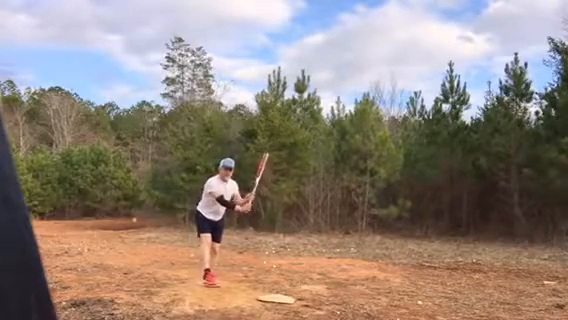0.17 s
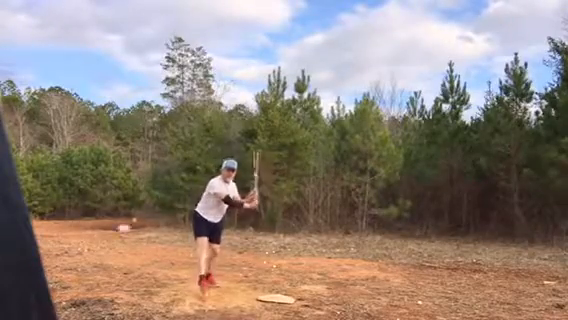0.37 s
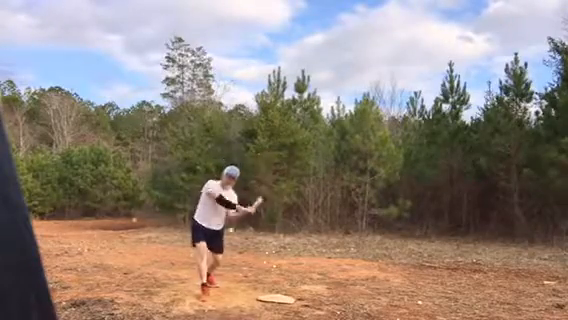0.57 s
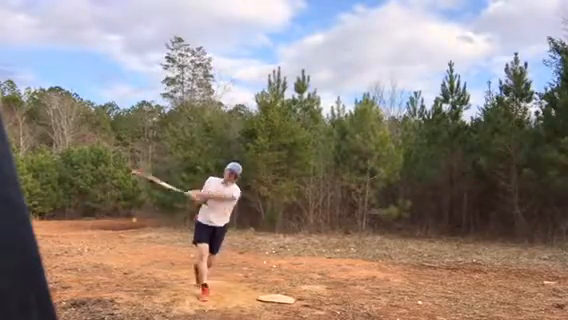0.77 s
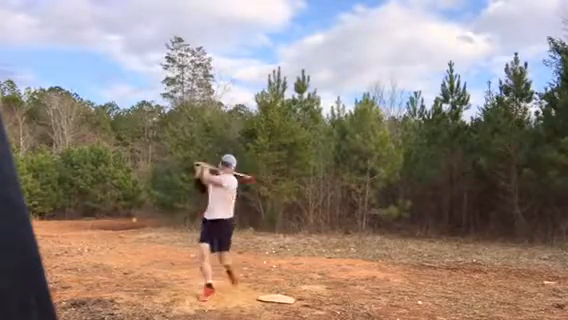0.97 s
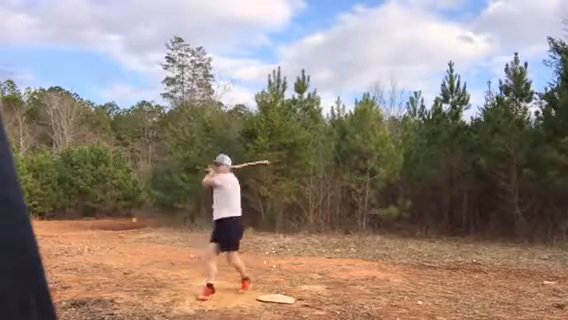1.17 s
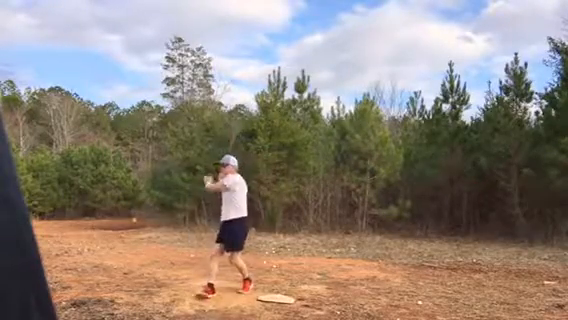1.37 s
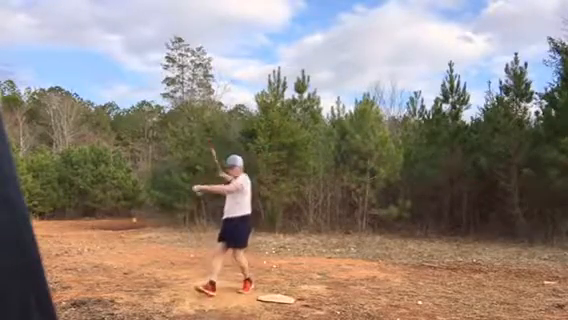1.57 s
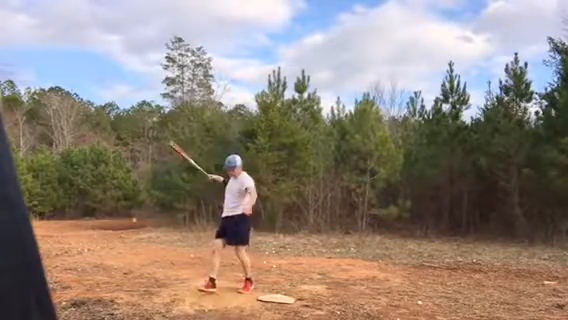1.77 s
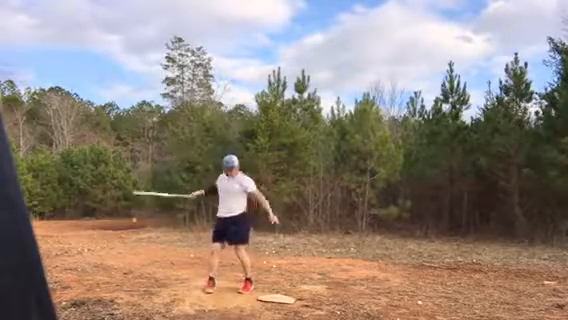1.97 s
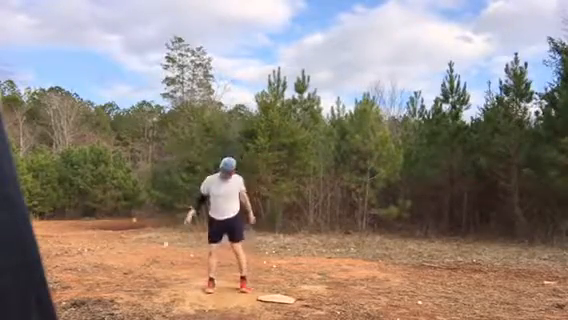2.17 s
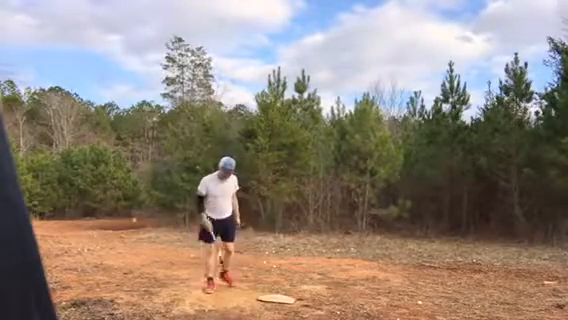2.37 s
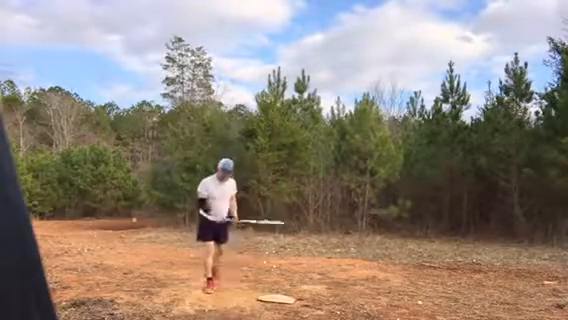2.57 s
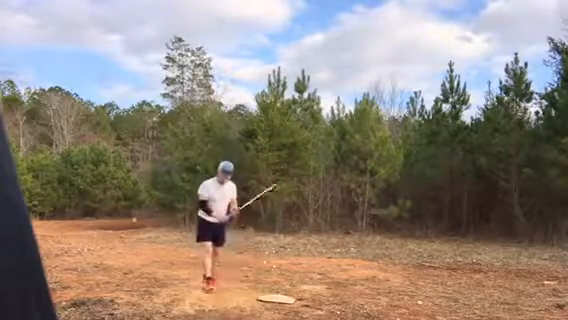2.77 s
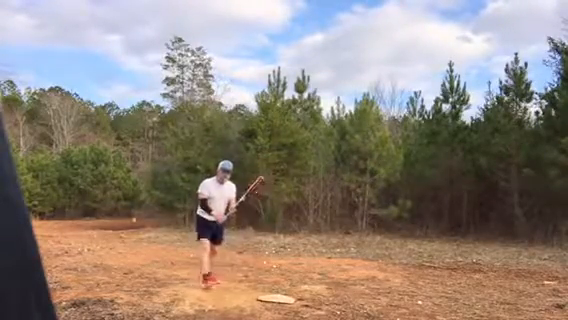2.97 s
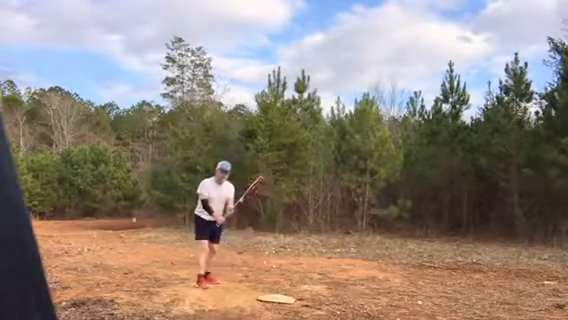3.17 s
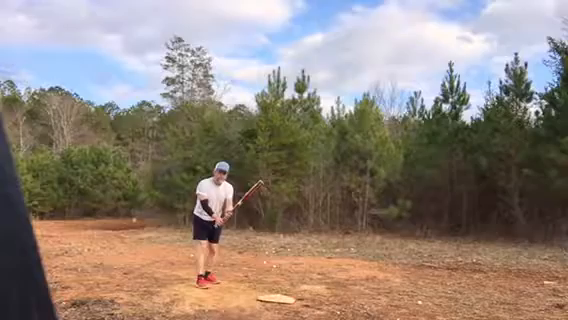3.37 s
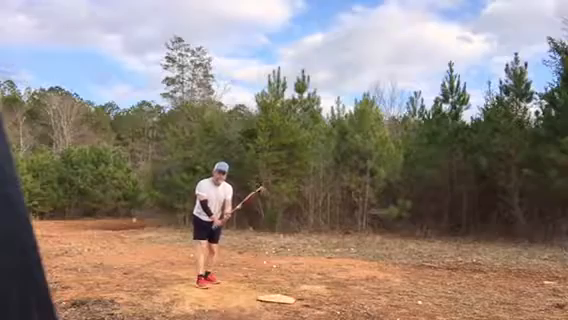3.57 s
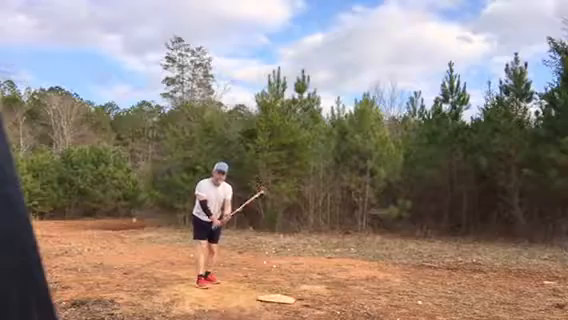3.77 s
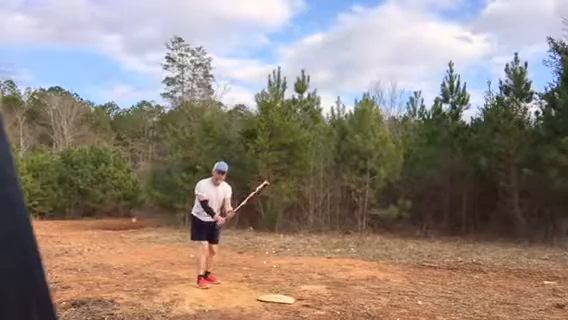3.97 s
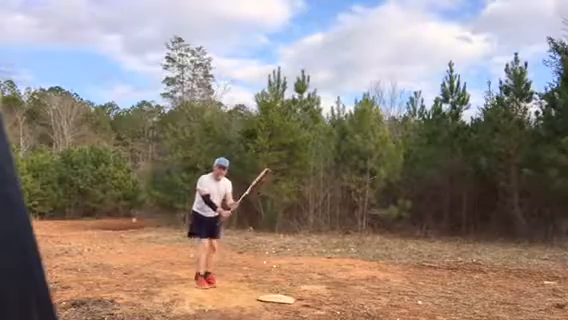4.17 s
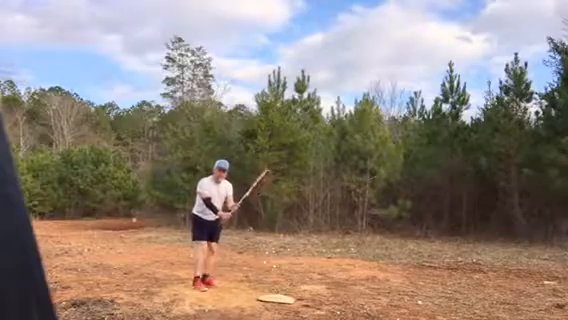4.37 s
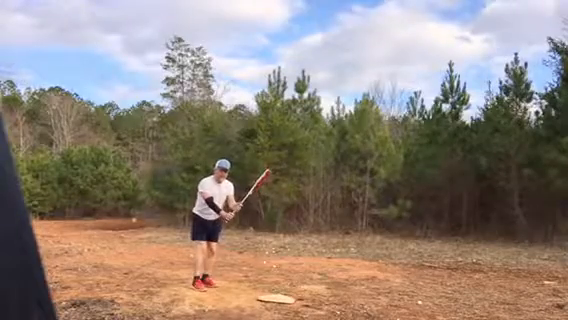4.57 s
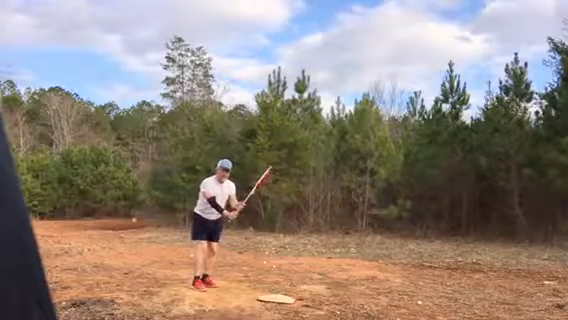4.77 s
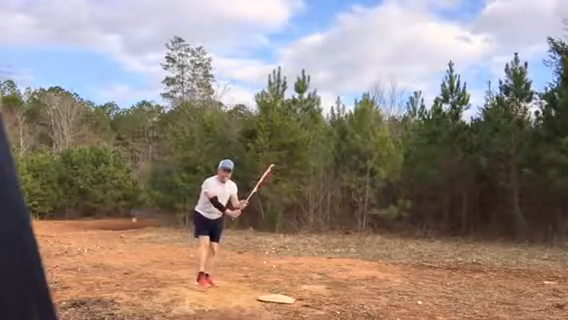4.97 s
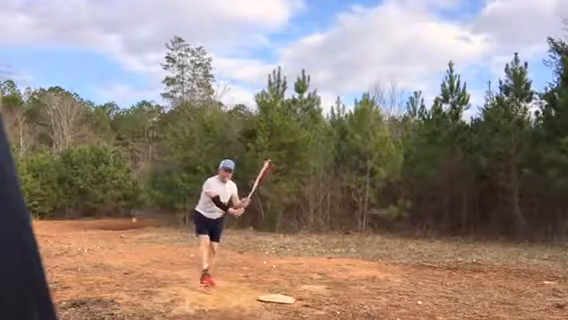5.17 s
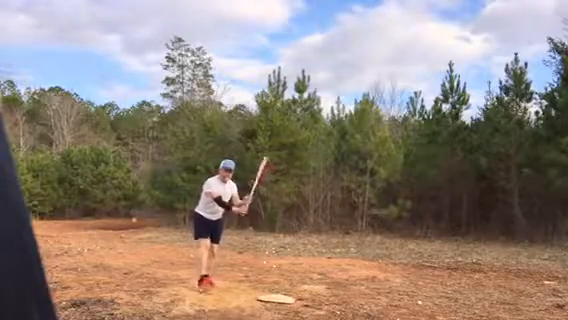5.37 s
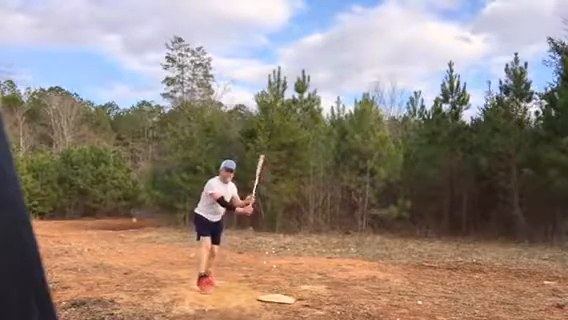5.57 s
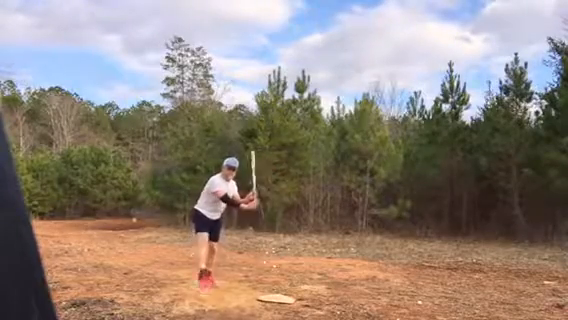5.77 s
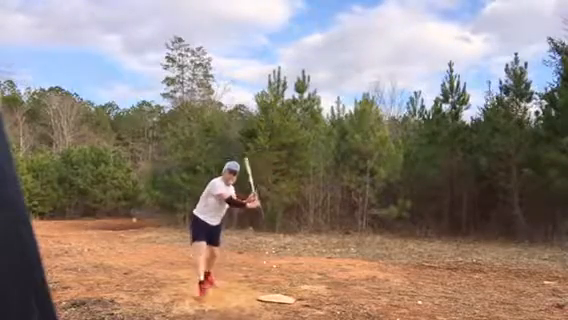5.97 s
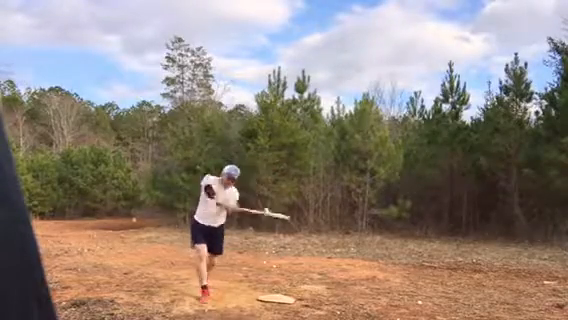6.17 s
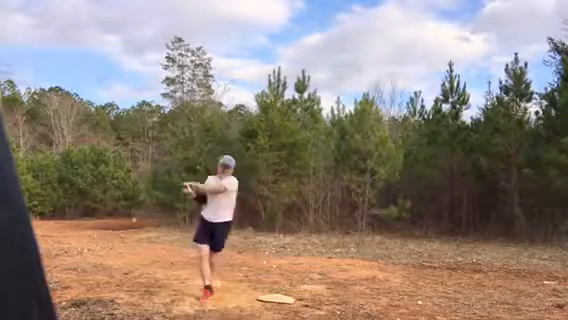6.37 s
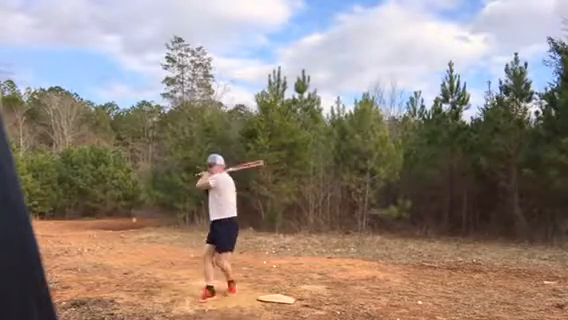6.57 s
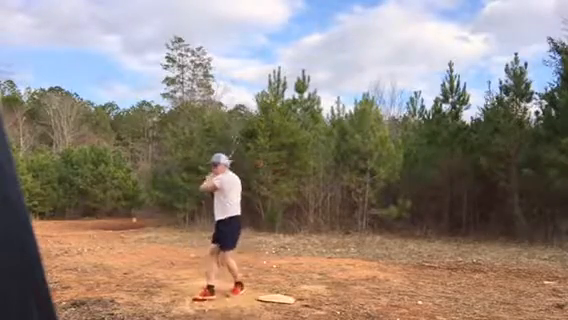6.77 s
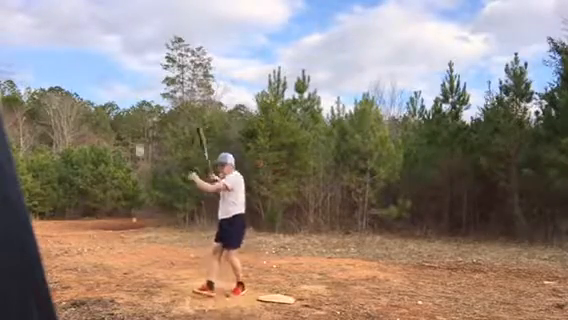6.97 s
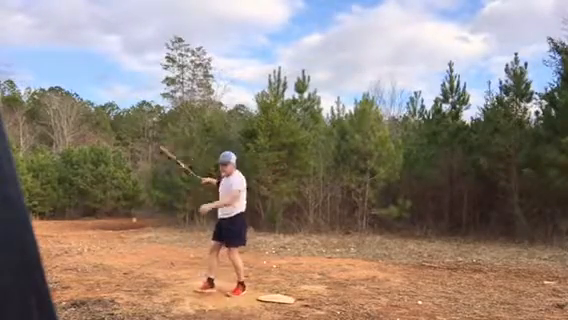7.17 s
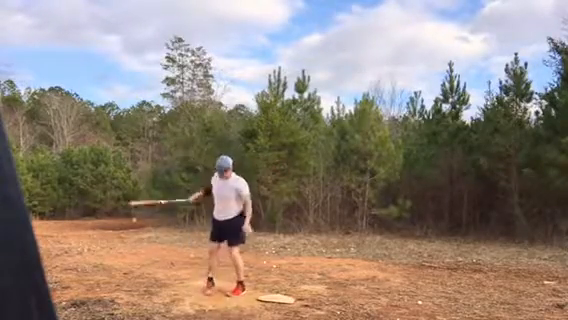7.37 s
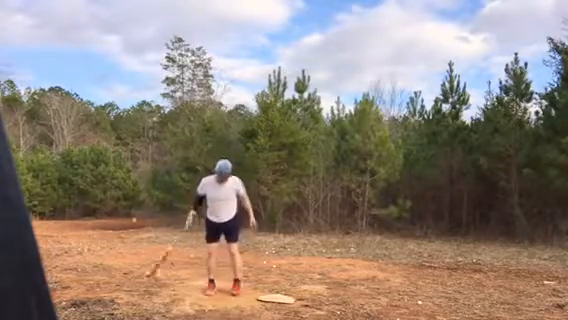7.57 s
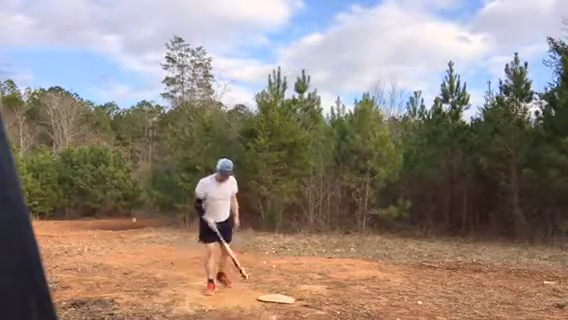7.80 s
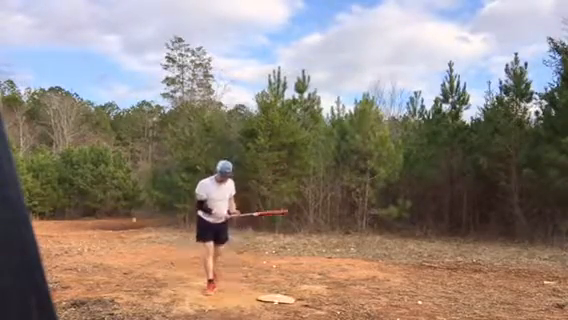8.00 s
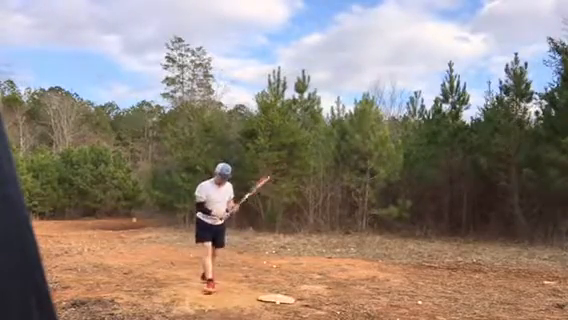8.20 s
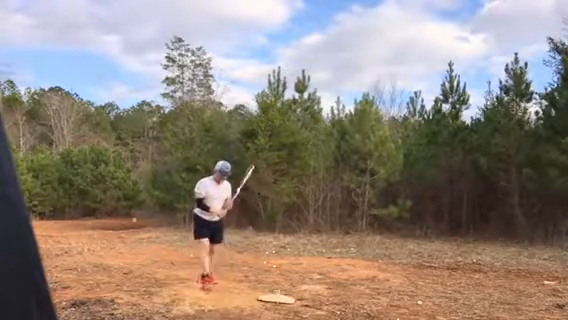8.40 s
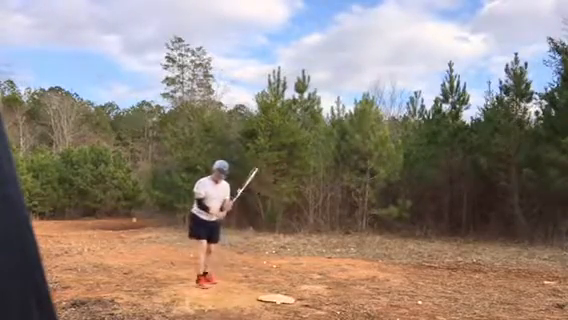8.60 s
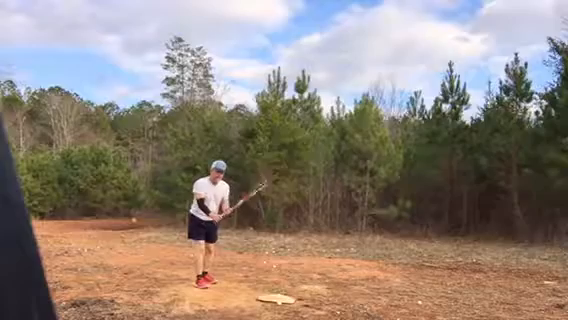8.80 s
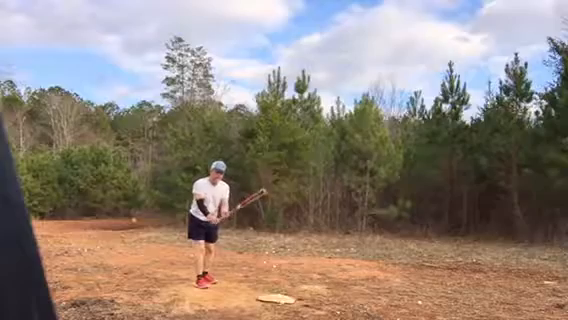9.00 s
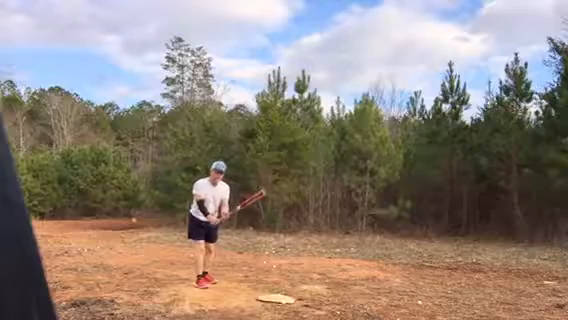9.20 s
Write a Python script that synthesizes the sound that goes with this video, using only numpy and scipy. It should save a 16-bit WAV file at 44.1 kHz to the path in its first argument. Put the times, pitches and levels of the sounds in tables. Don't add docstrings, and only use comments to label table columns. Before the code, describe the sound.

A pitching machine hums right by the microphone throughout, a nasal drone near 350 Hz with whirring overtones, rattle and airy hiss, throbbing roughly eleven times a second. From 0 to 0.3 s a ball knocks down the chute; at 0.4 s it is flung with a dull thump and brief squeak, and the hum drops about a semitone. At 0.84 s a metal bat cracks sharply some metres away, with a short bright ring. A light slap on the screen follows at 1.1 s, then ticks and dirt scuffs. The hum slowly rises until chute knocks at 5.4-5.75 s. A stronger throw thumps at 5.94 s, pitch sagging again; the bat cracks and rings at 6.33 s, and the ball booms into the close screen at 6.66 s. Scuffs, a sharp tick at 7.4 s and faint shuffling near 8.6 s follow as the wheels recover.

```python
import sys
import numpy as np
from scipy import signal
from scipy.fft import rfft, irfft
from scipy.io import wavfile
from scipy.ndimage import uniform_filter1d

SR = 44100
rng = np.random.default_rng(int(sys.argv[2]) if len(sys.argv) > 2 else 0)


def decibels_to_gain(level_db):
    exponent = np.asarray(level_db, float) / 20
    return 10 ** exponent


def to_wav(s):
    ch = np.atleast_2d(s).T
    pcm = np.round(np.clip(ch, -1, 1) * 32767)
    wavfile.write(sys.argv[1], SR, pcm.astype(np.int16))


N = 407484
T = np.arange(N) / SR


def colour(x, table):
    hz = np.maximum(np.arange(len(x) // 2 + 1) * SR / len(x), 1)
    table_hz, table_db = np.transpose(table)
    db = np.interp(np.log(hz), np.log(table_hz), table_db)
    third_octave_hz = .23 * hz
    return irfft(rfft(x) * decibels_to_gain(db) * np.sqrt(SR / 2 / third_octave_hz), len(x))


def band(x, hz, width):
    hz, width = min(hz, .45 * SR), min(width, .3 * SR)
    return signal.lfilter(*signal.iirpeak(hz, hz / width, SR), x) * np.sqrt(SR / np.pi / width)


def walk(rate, size=N):
    k = int(SR / rate)
    steps = np.repeat(rng.standard_normal(size // k + 1), k)
    return 1.5 * uniform_filter1d(uniform_filter1d(steps, k), k)[:size]


def fade(t, t60):
    return np.exp(-np.log(1000) * t / max(t60, .002))


def ring(t, modes, ratio=1):
    return sum(decibels_to_gain(db) * fade(t, t60) * np.sin(2 * np.pi * hz * ratio * t) for hz, db, t60 in modes)


def add(out, s, x):
    i = int(s * SR)
    out[i:i + len(x)] += x[:N - i]


def swell(out, start, length, db, hz, width, rise):
    size, room = int(length * SR), SR // 2
    grit = rng.standard_normal(room) * decibels_to_gain(2.5 * walk(148, size=room) + walk(18, size=room))
    shape = np.interp(T[:size] / length, [0, np.clip(rise, .02, .98), 1], [0, 1, 0])
    add(out, start, decibels_to_gain(db) * shape * band(grit, hz, width)[:size])


def blows(out, table, modes, rise_s, t60, crack_db, fizz_db):
    t = T[:SR // 2]
    for s, thump_db, body_db, click_db in table:
        noise = rng.standard_normal((4, len(t)))
        thump = ring(t, modes, 1 + .05 * noise[0, 0])
        thump = thump + 0.17 * fade(t, 3.66 * t60) * band(noise[0], 390, 108)
        body = decibels_to_gain(body_db) * fade(t, t60) * band(noise[1], 1050, 660)
        treble_fade = fade(t, 0.44 * t60)
        crack = decibels_to_gain(click_db + crack_db) * treble_fade * band(noise[2], 4700, 3300)
        fizz = band(noise[3], 7700, 3700) + .4 * band(band(noise[1], 13800, 3500), 13800, 7000)
        fizz = decibels_to_gain(click_db + fizz_db) * treble_fade * fizz
        scatter = np.minimum(t / 0.0026, 1) * (body + crack + fizz)
        add(out, s, scatter + decibels_to_gain(thump_db) * np.minimum(t / rise_s, 1) ** 2 * thump)


# (time [s], hum = four turns a second [Hz])
SPEED = [(0, 364.3), (.4, 364.4), (.43, 343.2), (.95, 345.2), (2.15, 352.9), (3.35, 358.4), (4.55, 362.9),
         (5.93, 367.3), (5.96, 340), (6.95, 342.9), (7.75, 344.8), (9.24, 352)]
# (time [s], lead of the fast wheel at the middle speed [Hz], beat start [turns])
RESETS = [
    (0, 10.9, -.1),
    (.415, 11.76, .114),
    (5.945, 12.46, .441),
]


def wheels():
    middle_hz, lead_loss = 352, .086
    hum_hz = np.interp(T, *np.transpose(SPEED))
    s, lead_hz, start = np.transpose(RESETS)
    since = np.searchsorted(s, T, side="right") - 1
    lead_hz = lead_hz[since] - lead_loss * (hum_hz - middle_hz)
    turns = np.cumsum(lead_hz) / SR
    beat_turns = turns - np.interp(s, T, turns)[since] + start[since]
    slow_turns = np.cumsum(hum_hz / 4) / SR
    return hum_hz, lead_hz, 2 * np.pi * slow_turns, 2 * np.pi * beat_turns


# (hum [Hz], depth [0-1], lead over rattle [turns])
THROB_LAW = [(344.5, 0.15, .72), (340.6, 0.16, 0.6), (358, 0.16, .52), (359.5, 0.02, 0.61),
             (365, 0.19, 0.22)]
ORDERS_SLOW_FAST = [(0, 1), (0, 2), (1, 1), (0, 3), (1, 2), (2, 1), (3, 0), (4, 1), (6, 0), (5, 1), (4, 2),
                    (7, 0), (6, 1), (8, 0), (9, 0), (7, 2), (12, 0), (13, 0), (12, 1), (16, 0), (20, 0),
                    (22, 0), (24, 0), (28, 0), (32, 0), (36, 0), (40, 0)]
ORDERS_DB = [-74, -64, -73, -64, -65, -65, -68, -71, -72, -72, -72, -73, -72, -63, -62, -76, -73, -79, -78,
             -77, -80, -83, -82, -85, -88, -90, -92]
# (frequency [Hz], half width [Hz], lift [dB])
BRACKETS = [(790, 25, 4), (1190, 30, 9), (1805, 30, 17), (3245, 60, 6)]
# (frequency [Hz], width [Hz], level [dB])
FRAME = [(204.3, 34, -76), (285, 85, -69), (382, 21, -62.5), (758, 33, -61.5), (1211, 45, -64),
         (1614, 6.7, -72.5), (1884, 37, -65.5), (3330, 76, -96), (5520, 290, -86)]
# (frequency [Hz], third-octave level [dB])
RATTLE = [(300, -97), (550, -68.5), (900, -66), (1400, -67), (2100, -71.5), (2600, -83.5), (4000, -86),
          (8000, -100)]
# (frequency [Hz], third-octave level [dB])
HISS = [(1500, -89.5), (3000, -94), (4500, -94), (5700, -79.5), (6900, -76), (8200, -79.5), (10500, -82),
        (13000, -79), (15600, -78.5), (16100, -110)]
# (frequency [Hz], third-octave level [dB])
RUMBLE = [(25, -108), (40, -88), (60, -75.5), (100, -75.5), (160, -71.5), (220, -83), (300, -63),
          (450, -68), (700, -80), (1200, -81.5)]


def machine():
    hum_hz, lead_hz, slow, beat = wheels()
    slow_hz = hum_hz / 4

    housing_hz, housing_width_hz, housing_db = 354.3, 14.3, -38.5
    at_hz, depth, ahead = np.transpose(THROB_LAW)
    ahead_angle = 2 * np.pi * np.interp(hum_hz, at_hz, ahead)
    throb = 1 + np.interp(hum_hz, at_hz, depth) * np.cos(beat + ahead_angle)
    detuning = (hum_hz - housing_hz) / housing_width_hz
    level = decibels_to_gain(housing_db + .5 * walk(25)) / np.sqrt(1 + detuning ** 2)
    tones = np.sqrt(2) * level * throb * np.sin(4 * slow)

    every = 100
    for (a, b), db in zip(ORDERS_SLOW_FAST, ORDERS_DB):
        order_hz = ((a + b) * slow_hz + b * lead_hz)[::every]
        lift_db = sum(top_db / (1 + ((order_hz - hz) / width) ** 2) for hz, width, top_db in BRACKETS)
        lift_db = np.repeat(lift_db + 1.9 * walk(700, size=len(order_hz)), every)[:N]
        wander = np.repeat(.45 * walk(1500, size=len(order_hz)), every)[:N]
        angle = (a + b) * slow + b * beat + 2 * np.pi * rng.uniform() + wander
        tones = tones + np.sqrt(2) * decibels_to_gain(db + lift_db) * np.sin(angle)

    knock = np.cos(beat) + .4 * np.cos(slow) + .3 * np.cos(slow + beat)
    frame = sum(decibels_to_gain(db + 0.81 * walk(9)) * band(rng.standard_normal(N), hz, width) for hz, width, db in FRAME)
    rattle = colour(rng.standard_normal(N) * decibels_to_gain(2.3 * knock + .4 * walk(6)), RATTLE)
    beat_db = 3.2 * np.cos(beat) + 1.2 * np.cos(2 * beat) + 2.1 * np.cos(slow) + 2.1 * np.cos(slow + beat)
    hiss_db = beat_db + .4 * (slow_hz - 88) + .6 * walk(3)
    hiss = colour(rng.standard_normal(N) * decibels_to_gain(hiss_db), HISS)
    rumble = colour(rng.standard_normal(N) * decibels_to_gain(1.35 * walk(6)), RUMBLE)
    return tones + decibels_to_gain(2.2 * knock - 1) * frame + rattle + hiss + rumble


# (time [s], peak level [dB], centre [Hz])
TICKS = [(0.019, -47, 2000), (.054, -31, 900), (.398, -34, 14500), (5.661, -37, 1700), (.1474, -33, 8600),
         (0.193, -37, 9000), (.2718, -39, 4800), (1.0959, -32, 4610), (1.258, -26.5, 2200),
         (1.2575, -29.5, 4500), (1.259, -33, 8500), (2.128, -37, 11100), (4.082, -33, 1490),
         (5.44, -41, 1600), (5.5513, -36.5, 6500), (5.6366, -38, 7920), (5.66, -44, 8550),
         (6.0985, -43, 4200), (6.767, -38.5, 5100), (7.3816, -23.5, 8150), (7.382, -27, 3300),
         (7.404, -37, 3300), (7.6644, -46, 5480), (7.7777, -44, 6080), (8.036, -37, 5800),
         (8.3873, -44, 4730)]
# (start [s], length [s], level [dB], centre [Hz])
SWISH = [
    (0.656, 0.18, -62, 5200),
    (.84, 0.17, -62, 4500),
    (6.225, 0.081, -63, 5000),
    (6.384, 0.35, -61.5, 3600),
]
# (start [s], length [s], level [dB], centre [Hz])
FEET = [(1.188, 0.16, -61.5, 3500), (1.244, 0.37, -63.5, 4800), (3.102, 0.45, -71, 4000),
        (6.751, 0.46, -65.5, 4680), (8.577, .4, -66.5, 5050)]
# (start [s], length [s], level [dB], centre [Hz])
TWIG = (8.55, .28, -77, 3100)


def ground():
    t, near = T[:SR // 10], np.zeros(N)
    for s, db, hz in TICKS:
        t60 = max(37 / hz, 0.016)
        noise = band(band(rng.standard_normal(len(t)), hz, .75 * hz), hz, 1.5 * hz)
        add(near, s, decibels_to_gain(db - 15.5) * np.sqrt(hz / SR * 5) * fade(t, t60) * noise)
    for start, length, db, hz in SWISH:
        swell(near, start, length, db, hz, 0.49 * hz, rise=.5)
    for start, length, db, hz in FEET:
        swell(near, start, length, db, hz, 0.75 * hz, rise=.15)
        swell(near, start, length, db - 10.5, 8500, 1300, rise=.15)
        swell(near, start, 0.36 * length, db - 11, 11500, 6000, rise=.15)
    swell(near, *TWIG, 110, .55)
    echo_delay_s = .00066
    return near + .45 * np.roll(near, int(echo_delay_s * SR))


# (time [s], thump [dB], click [dB])
CHUTE = [(.016, -39, -44.5), (0.055, -26.5, -58), (.089, -50, -62), (.151, -27, -53), (0.196, -29, -51),
         (.234, -32, -66), (.277, -30, -63), (4.084, -38, -63), (4.292, -35, -75), (5.42, -25.5, -58),
         (5.44, -51, -52), (5.472, -34, -66), (5.514, -33.5, -58), (5.571, -39, -48), (5.595, -34, -68),
         (5.662, -27, -45), (5.707, -36, -70), (5.738, -32, -68)]
# (frequency [Hz], level [dB], t60 [s])
CHUTE_MODES = [(312, 2.5, 0.048), (327.5, -4.5, 0.14), (630, -12.5, 0.078)]


def chute(out):
    bounces = [(s, thump_db, -16.5 + .6 * click_db, click_db) for s, thump_db, click_db in CHUTE]
    blows(out, bounces, CHUTE_MODES, rise_s=0.0074, t60=0.027, crack_db=-25, fizz_db=2.5)


# (time of the fling [s], level [dB], delay until the ball leaves the mouth [s])
THROW = [
    (.4035, 0, .029),
    (5.932, 2, .032),
]
# (time from the fling [s], thump [dB], body [dB], click [dB])
GRIP = [
    (-.009, -51, -55, -47),
    (-.0045, -43, -36, -39),
    (0, -24, -40.5, -37),
    (.015, -48, -43, -38),
]
# (frequency [Hz], level [dB], t60 [s])
THROW_MODES = [(118, -14, 0.098), (297, -7.5, 0.05), (325, 1, 0.088), (429, -12.5, 0.17), (721, -8, 0.073)]


def throw(out):
    leave_db = (-33, -54, -46.5)
    squeak_hz, squeak_width_hz, squeak_db, squeak_s = 7998, 1500, -43.5, .023
    for s, db, leave_s in THROW:
        steps = np.array([*GRIP, (leave_s, *leave_db)]) + [s, db, db, db]
        blows(out, steps, THROW_MODES, rise_s=.0034, t60=0.06, crack_db=-15, fizz_db=-.1)
        swell(out, s - squeak_s / 2, squeak_s, squeak_db + db, squeak_hz, squeak_width_hz, .55)


# (time [s], thump [dB], body [dB], click [dB])
SCREEN = [
    (1.115, -34.5, -39, -46),
    (1.123, -41, -58, -48),
    (1.135, -47, -52, -47),
    (6.6582, -24.5, -28.5, -23.5),
    (6.661, -25, -24.5, -22.5),
    (6.667, -29, -50, -45),
    (6.672, -26.5, -37, -32),
    (6.68, -30, -41, -46),
]
# (frequency [Hz], level [dB], t60 [s])
SCREEN_MODES = [(78.4, -17.5, 0.27), (90, -14.5, 0.15), (164, -8, 0.24), (266, -0.5, 0.078),
                (305, 3.5, 0.08), (471, -2, 0.095), (732, -2, 0.085), (1080, -11, 0.049)]


def screen(out):
    blows(out, SCREEN, SCREEN_MODES, rise_s=0.0018, t60=0.11, crack_db=2.3, fizz_db=-17)


def flash(out, s, length, hz, db):
    t = T[:int(length * SR)]
    waver = decibels_to_gain(3.5 * walk(150, size=SR // 4))[:len(t)]
    drift = .9 * walk(150, size=SR // 4)[:len(t)]
    tone = np.sin(2 * np.pi * hz * t * (1 - .03 * t) + drift)
    add(out, s, decibels_to_gain(db) * np.sin(np.pi * t / length) * waver * tone)


# (time [s], crack [dB], ring [dB], whistle [Hz], delay until the bat swings away [s])
BAT = [
    (0.8369, -19, -37, 7950, 0.078),
    (6.332, -22.5, -27.5, 5300, .088),
]
# (frequency [Hz], level [dB], t60 [s])
BAT_MODES = [
    [(81, -10, 0.2), (190, -0.5, 0.052), (2640, -3, 0.13), (3560, -1, 0.02), (4800, 0, .02),
     (8200, 17, 0.016), (8100, -5, 0.12), (14700, 0, .025)],
    [(168, -11, 0.074), (2730, -4, 0.079), (3150, 3, 0.087), (3630, 2, 0.021), (4300, 0, 0.018),
     (5220, -12, .025), (7780, -3, 0.094), (8150, -4, 0.059), (8950, -7, .04), (10870, 0, 0.027),
     (14320, -10, .03)],
]
# (frequency [Hz], level in line [dB], level once swung away [dB])
FLASH = [
    [(2650, -62, -52), (6150, -62, -66), (7900, -66, -72), (11100, -58, -61)],
    [(3125, -57, -64), (7780, -66, -60), (8950, -62, -80), (14320, -55, -62)],
]
AFTER_RATIO = [
    .93,
    1,
]
# (frequency [Hz], third-octave level [dB])
CRACK = [(100, -64), (600, -21), (1500, -14), (3000, -6), (4500, -2), (6500, -13), (8200, -7), (11000, -4),
         (15000, 2), (16900, -27), (17300, -60)]


def bat(out):
    whistle_s, whistle_db = 0.02, -58
    in_line_s, flash_s, away_ratio = .022, .042, .917
    after_s, after_db = .2, -68
    t = T[:SR // 2]
    for (s, crack_db, ring_db, whistle_hz, away_s), modes, lobes, after in zip(BAT, BAT_MODES, FLASH, AFTER_RATIO):
        swell(out, s - whistle_s, whistle_s, whistle_db, whistle_hz, 850, .9)
        turn = decibels_to_gain(2.5 * walk(150, size=len(t))) / (1 + (t / .06) ** 8)
        patchy = decibels_to_gain(2.2 * walk(150, size=len(t)))
        tail = fade(t, 0.0062) + patchy * (0.15 * fade(t, 0.023) + 0.093 * fade(t, 0.16))
        pines = .5 * patchy * fade(t, 1.0) * band(rng.standard_normal(len(t)), 5000, 5000)
        add(out, s, decibels_to_gain(crack_db - 29) * pines)
        burst = np.roll(rng.standard_normal(len(t)) * tail, SR // 100)
        add(out, s - .01, decibels_to_gain(crack_db - 8.5) * colour(burst, CRACK))
        add(out, s, decibels_to_gain(ring_db) * np.minimum(t / 0.0003, 1) * turn * ring(t, modes))
        for k, (hz, line_db, away_db) in enumerate(lobes):
            longer = 1.5 if k == 0 else 1
            flash(out, s + in_line_s / longer, longer * flash_s, hz, line_db)
            away = s + away_s - 0.0032 * k + 0.011 * rng.standard_normal()
            flash(out, away, longer * flash_s, away_ratio * hz, away_db)
        flash(out, s + away_s, after_s, after * lobes[0][0], after_db)


def scene():
    out = machine() + ground()
    chute(out)
    throw(out)
    screen(out)
    bat(out)
    return out[None]


def band_limit(x):
    return signal.sosfilt(signal.butter(12, 16990, fs=SR, output="sos"), x)


def record(dry):
    limit, top_hz, top_opens_db = .3, 15900, -54
    x = signal.sosfilt(signal.butter(3, 45, "high", fs=SR, output="sos"), dry)
    x = x - .55 * signal.lfilter(*signal.iirpeak(6900, 4.5, SR), x)
    x = limit * np.tanh(x / limit)
    low = signal.sosfiltfilt(signal.ellip(8, .2, 40, top_hz, fs=SR, output="sos"), x)
    opens = uniform_filter1d(np.abs(x - low), size=512) > decibels_to_gain(top_opens_db)
    mix = low + uniform_filter1d(1. * opens, size=128) * (x - low)
    return band_limit(mix)


dry = scene()
out = record(dry)
to_wav(out)
```